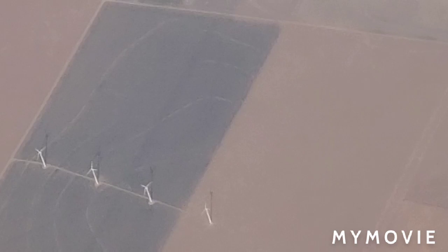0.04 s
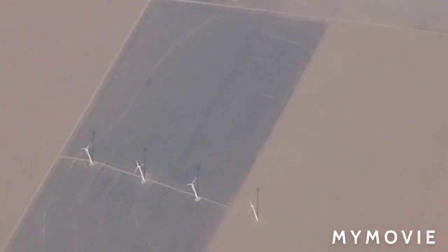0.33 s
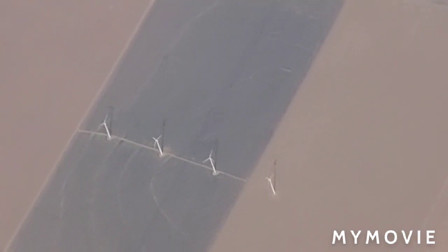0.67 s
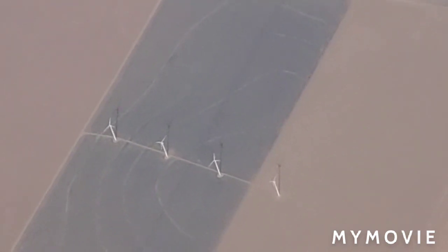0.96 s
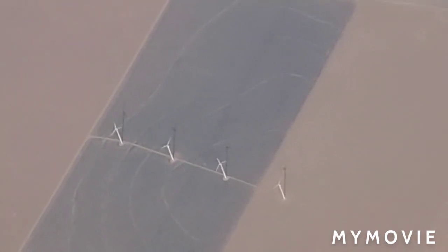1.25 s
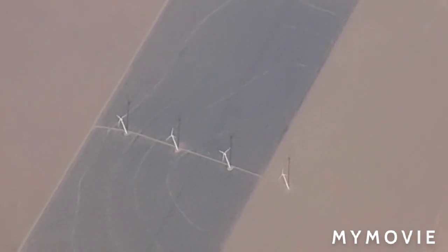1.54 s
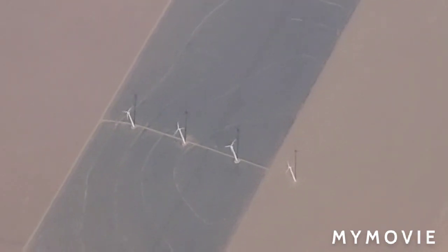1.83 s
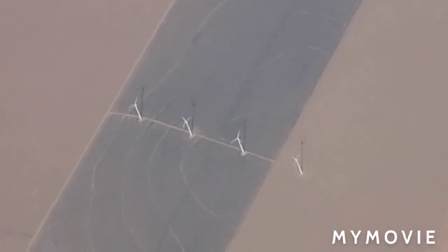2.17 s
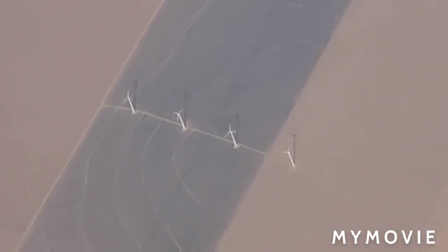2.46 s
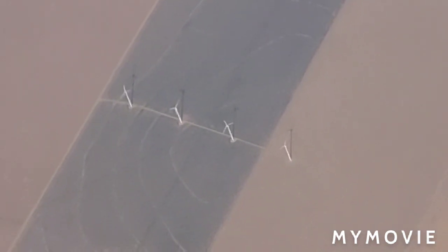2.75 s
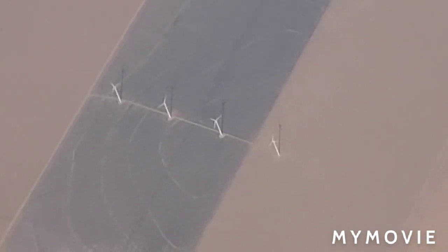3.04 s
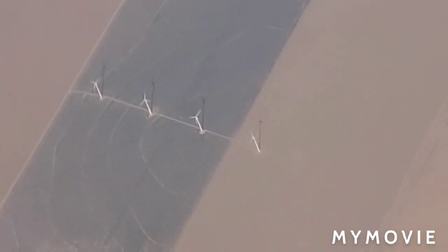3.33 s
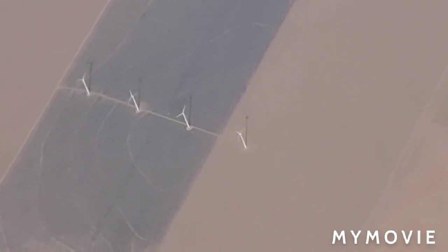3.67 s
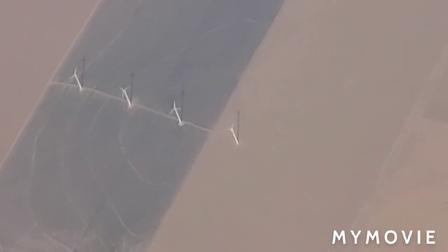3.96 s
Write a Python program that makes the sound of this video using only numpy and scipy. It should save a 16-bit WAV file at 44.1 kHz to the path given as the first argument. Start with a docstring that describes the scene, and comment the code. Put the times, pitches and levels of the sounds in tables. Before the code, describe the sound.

Jet engines roaring deeply and steadily from inside a cruising plane, under an even airflow hiss.

```python
"""Jet airliner cabin in steady flight. The engines' turbulent roar fills the cabin and rings its
broad resonances, the bass wavering irregularly. Air rushing along the fuselage and from the vents
adds an even hiss, which flares once in the treble. One faint tick sounds close by."""
import sys
import numpy as np
from scipy import signal
from scipy.fft import rfft, irfft
from scipy.io import wavfile
from scipy.ndimage import uniform_filter1d, map_coordinates

SR = 44100
rng = np.random.default_rng(int(sys.argv[2]) if len(sys.argv) > 2 else 0)


def master(y):
    """Save y as 16-bit WAV."""
    cut = np.clip(np.atleast_2d(y).T, -1, 1)
    pcm = np.round(cut * 32767)  # scale
    wavfile.write(sys.argv[1], SR, pcm.astype(np.int16))


N = 176400
TIME_S = np.arange(N) / SR
BIN_HZ = np.maximum(np.arange(N // 2 + 1) * SR / N, 1)


def undb(db):
    """Decibels to gain."""
    return 10 ** (np.asarray(db) / 20)


def at_rms(x, level_db):
    """Scale to an rms level."""
    return x * undb(level_db) / np.sqrt(np.mean(x ** 2))


def noise(gain):
    """Random-phase noise with the given gain per bin."""
    return irfft(gain * np.exp(2j * np.pi * rng.random(N // 2 + 1)), N)


def turbulence(spectrum):
    """Broadband noise shaped by (freq_hz, gain_db) points."""
    freq_hz, gain_db = np.array(spectrum).T
    return noise(undb(np.interp(np.log(BIN_HZ), np.log(freq_hz), gain_db)))


def band_noise(centre_hz, width_hz):
    """Noise through a steep-skirted resonance."""
    detuning = (BIN_HZ - centre_hz ** 2 / BIN_HZ) / width_hz
    return noise(1 / (1 + .5 * detuning ** 2))


def lowpass(x, edge_hz, order=16):
    """Zero-phase low-pass."""
    return irfft(rfft(x) / (1 + (BIN_HZ / edge_hz) ** order), N)


def drift(rate_hz):
    """Smooth random curve of unit rms."""
    return at_rms(noise(1 / (1 + (BIN_HZ / rate_hz) ** 2)), 0)


def envelope(points):
    """Gain through (time_s, gain_db) points."""
    time_s, gain_db = np.array(points).T
    return undb(np.interp(TIME_S, time_s, gain_db))


def steady(x, window_s=.22):
    """Even out slow level swings; keep the quick flutter."""
    size = int(window_s * SR)
    power = uniform_filter1d(x ** 2, size, mode="wrap")
    power = uniform_filter1d(power, size // 2, mode="wrap")
    return x * np.sqrt(np.mean(x ** 2) / power)


def wander(x, pitch_fraction=.008, rate_hz=2):
    """Slight random pitch drift."""
    position = np.cumsum(1 + pitch_fraction * drift(rate_hz))
    return map_coordinates(x, [position], order=3, mode="grid-wrap")


def ringing(modes):
    """Resonances driven by turbulence, each drifting on its own."""
    return sum(at_rms(wander(band_noise(centre_hz, width_hz)), level_db)
               for centre_hz, width_hz, level_db in modes)


# Roar through the hull: freq_hz, gain_db
ROAR_SPECTRUM = [(45, -4.5), (72, -1), (105, -1), (200, -1.8), (300, -7.5), (370, -6.5), (430, -13),
                 (620, -17), (820, -20), (1100, -26.5), (1450, -33.5), (2500, -65)]
# Cabin resonances: centre_hz, width_hz, level_db
CABIN_MODES = [(148, 17, -29.5), (168.3, 10.3, -31), (263.8, 19, -29.5), (325, 28, -29.5),
               (355.4, 18.3, -33.5), (494.4, 15, -42), (577, 43, -34.5), (677.6, 51, -39.5), (770, 22, -42),
               (1011, 24, -52.5)]
# Deep bass wavering: time_s, gain_db
DEEP_BASS_SWELL = [(0.0, 0.5), (0.24, -1.2), (0.32, 2.5), (0.72, -2), (0.96, 3), (1.12, -1), (1.44, -1),
                   (1.92, 1.5), (2.08, -2.8), (2.24, 1), (2.4, -2), (2.56, 2.3), (2.8, -1), (3.28, 0.5),
                   (3.4, -1.3), (4.0, 2.5)]
# Upper bass wavering: time_s, gain_db
UPPER_BASS_SWELL = [(0.0, 0), (0.24, 1.5), (0.64, 0), (0.88, -3.5), (0.96, 4), (1.6, -5), (1.76, 2.4),
                    (2.08, -3), (2.32, -2), (2.4, 3.5), (2.56, -1.5), (2.72, 5), (2.96, -7.5), (3.12, 4),
                    (3.2, -5.5), (3.36, 2), (3.52, -3), (4.0, 4.5)]
# Midrange drone wavering: time_s, gain_db
DRONE_SWELL = [(0.0, 0), (0.22, 3), (0.5, 0.5), (0.95, -1), (1.5, 0.5), (1.75, -2.5), (2.15, -1),
               (2.28, 1.5), (3.3, 0.4), (4.0, -.5)]

def engines(flutter_db=.19):
    """Turbulent roar rings the cabin; deep bass, upper bass and drone waver separately."""
    roar = at_rms(turbulence(ROAR_SPECTRUM), level_db=-18) + ringing(CABIN_MODES)
    deep = lowpass(roar, edge_hz=117)
    bass = lowpass(roar, edge_hz=185)
    drone = lowpass(roar, edge_hz=656) - lowpass(roar, edge_hz=500)
    wavering = steady(deep) * envelope(DEEP_BASS_SWELL)
    wavering += steady(bass - deep) * envelope(UPPER_BASS_SWELL)
    wavering += steady(drone) * envelope(DRONE_SWELL)
    rest = steady(roar - bass - drone)
    return (wavering + rest) * undb(flutter_db * drift(rate_hz=5.4))


def treble_flare(peak_s=1.83, spread_s=.05):
    """A brief swell of high hiss."""
    swell = np.exp(-((TIME_S - peak_s) / spread_s) ** 2)
    return swell * at_rms(band_noise(centre_hz=5900, width_hz=1700), level_db=-60)


# Airflow hiss: freq_hz, gain_db
HISS_SPECTRUM = [(600, -1.5), (1500, 0), (2100, 0.5), (2450, 0), (3200, -2.5), (3750, -2.5), (4150, -7.5),
                 (4600, -10), (5700, -14), (6900, -15), (7800, -30), (9800, -26.5), (11200, -20.5),
                 (13000, -25)]
# Vent resonances: centre_hz, width_hz, level_db
VENT_MODES = [(1730, 145, -54), (2010, 80, -64.5), (2730, 180, -57.5), (3480, 130, -61)]
# Slow changes of the hiss: time_s, gain_db
HISS_SWELL = [(0.0, 1.5), (0.24, 0.2), (0.72, 0.4), (1.2, -0.3), (3.12, 1), (3.68, 0.5), (4.0, 0.5)]

def airflow(flutter_db=.43):
    """Air along the fuselage and from the vents: softly resonant hiss with one flare."""
    hiss = at_rms(turbulence(HISS_SPECTRUM), level_db=-44.5) + ringing(VENT_MODES)
    hiss += treble_flare()
    return hiss * envelope(HISS_SWELL) * undb(flutter_db * drift(rate_hz=13))


def tick(start_s=2.4012, t60_s=.055):
    """A small bright contact that dies at once."""
    age_s = TIME_S - start_s
    decay = (age_s >= 0) * np.exp(-np.log(1000) * np.abs(age_s) / t60_s)
    return decay * at_rms(band_noise(centre_hz=7000, width_hz=3600), level_db=-53)


def scene():
    """The cabin from a window seat, mono."""
    return (engines() + airflow() + tick())[None]


def record(dry, low_cut_hz=44.7, low_cut_order=7.5, top_hz=15650):
    """The microphone drops the deepest rumble, softens the highest treble and cuts the top."""
    low_cut = 1 / np.sqrt(1 + (low_cut_hz / BIN_HZ) ** (2 * low_cut_order))
    trimmed = irfft(rfft(dry) * low_cut, N)
    softened = lowpass(trimmed, edge_hz=14500, order=12)
    top_cut = signal.ellip(10, .2, 80, top_hz, fs=SR, output="sos")
    return signal.sosfilt(top_cut, softened)


dry = scene()
out = record(dry)
master(out)
```